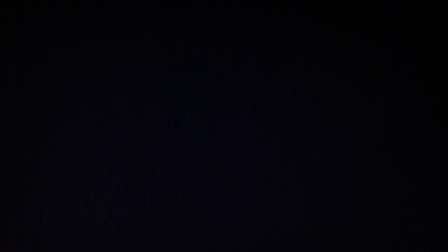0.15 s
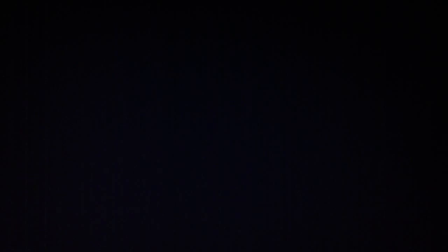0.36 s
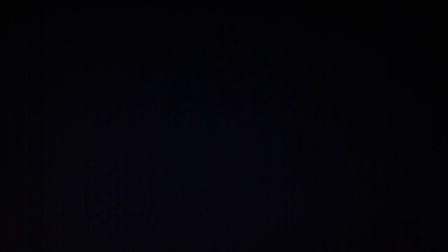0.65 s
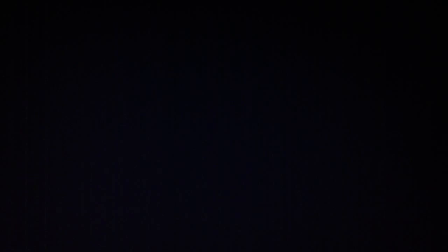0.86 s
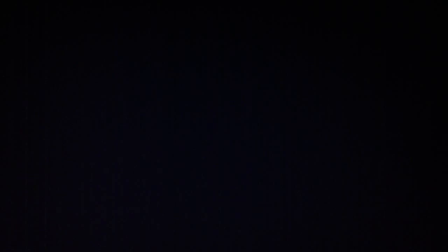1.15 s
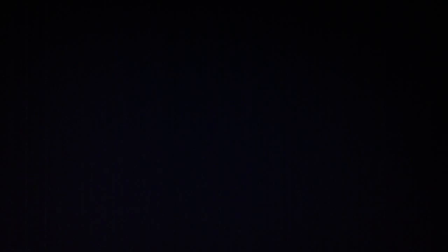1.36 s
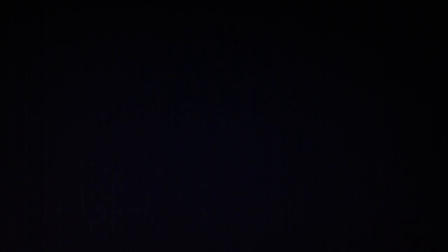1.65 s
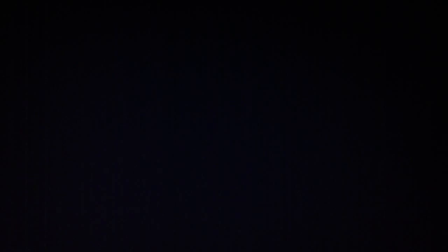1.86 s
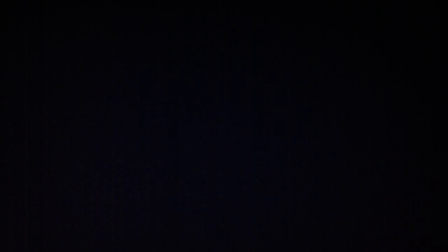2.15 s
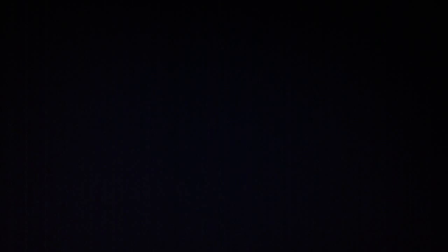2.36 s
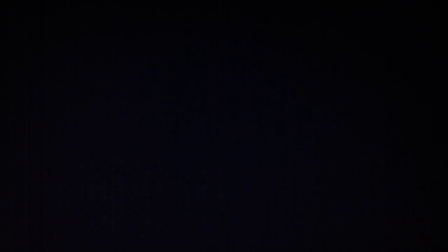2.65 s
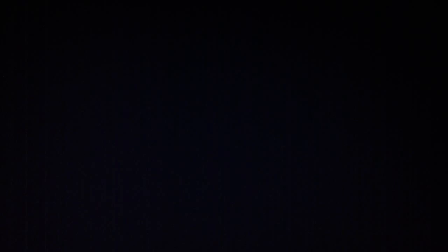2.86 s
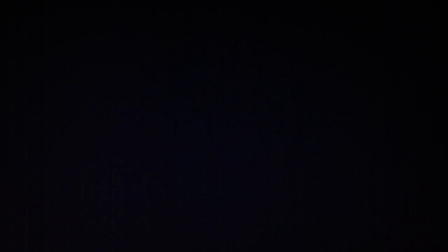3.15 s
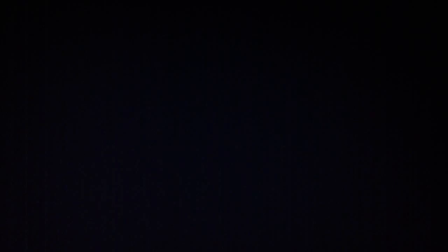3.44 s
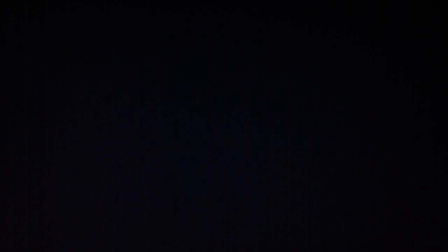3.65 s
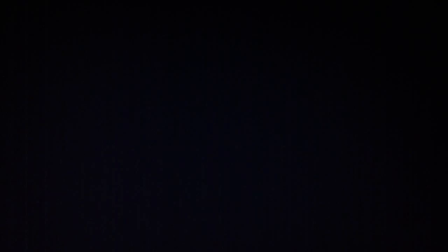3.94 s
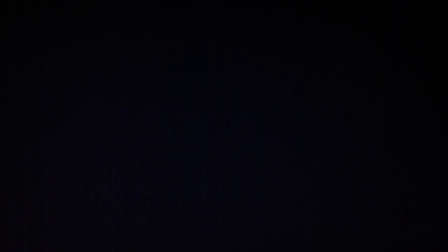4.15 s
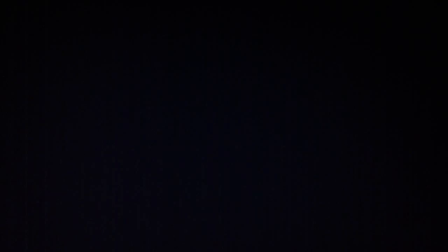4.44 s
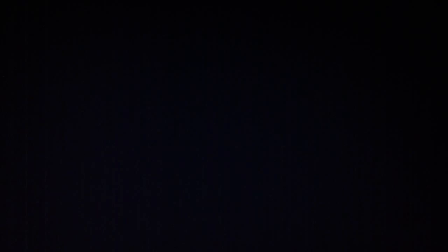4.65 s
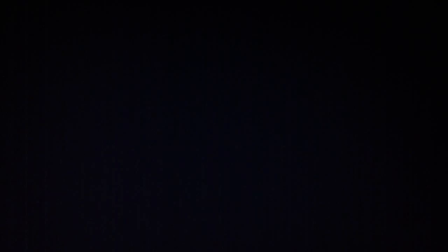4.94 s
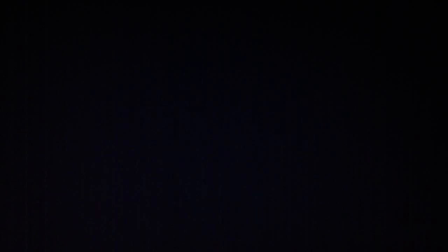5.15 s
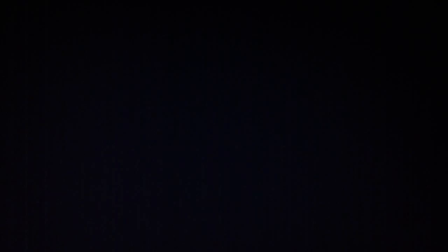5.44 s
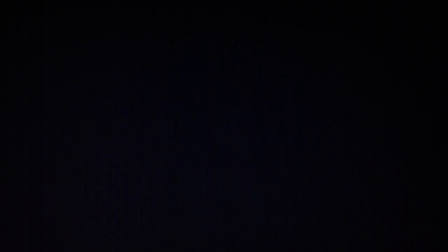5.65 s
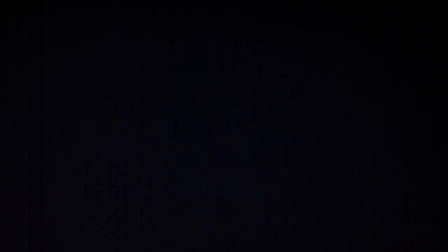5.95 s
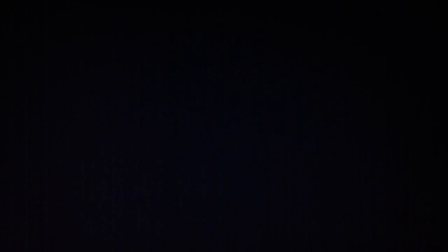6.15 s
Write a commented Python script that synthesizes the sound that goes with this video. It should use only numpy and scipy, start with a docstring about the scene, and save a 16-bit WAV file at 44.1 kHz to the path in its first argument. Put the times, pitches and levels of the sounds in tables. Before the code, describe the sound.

A close microphone fixed to a speeding sled picks up the boxy low boom of its hull over rough ice. One sharp steel crack comes near the start, then uneven bumps pound the shell. A brief sideways scrape hisses before two seconds. Afterwards the ride grows louder and rougher, with many slaps, rattles, gritty bursts and faint squeaks, still going strong at the end. The sound is dry and mono.

```python
"""A deep, hollow rumble comes first, with rattling and a fine crackle: a bobsleigh on ice, heard from on board.
Noise shaped like the hull's tone makes the rumble; each bump thumps the hull, knocks the frame and shakes fittings.
A hard clack comes near the start, then ice chips tick and a hissing skid swells and fades.
Bursts of filtered noise make the slaps, grit, squeaks and ice dust; the rumble climbs slightly in pitch.
A limiter holds the loudest peaks."""
import sys
import numpy as np
from scipy import signal
from scipy.fft import rfft, irfft
from scipy.io import wavfile
from scipy.ndimage import uniform_filter1d, minimum_filter1d

SR = 44100
rng = np.random.default_rng(int(sys.argv[2]) if len(sys.argv) > 2 else 0)


def materialize(psi):
    """Save the field psi as 16-bit PCM at rate SR to the path in sys.argv[1].

    A 1-D psi becomes a single channel; in a 2-D psi each row is a channel.
    """
    bounded = np.clip(np.atleast_2d(psi).T, -1, 1)
    quanta = np.round(bounded * 32767).astype(np.int16)
    wavfile.write(sys.argv[1], SR, quanta)


N = 277830
T = np.arange(N) / SR  # time of each sample, s

# All table levels are relative: the layer that plays a table may add its own gain.


def amp(db):
    """Turns decibels into a gain."""
    return 10 ** (np.asarray(db) / 20)


def unit(x):
    """Scales a signal to rms 1."""
    return x / np.sqrt(np.mean(x ** 2) + 1e-20)


def colour(x, spectrum, peaks=(), ripple_db=0):
    """Filters a sound with a spectrum, resonant peaks and a random ripple of lesser modes; the result has rms 1."""
    hz = abs(np.fft.fftfreq(8192, 1 / SR))
    table_hz, table_db = np.transpose(spectrum)
    db = np.interp(np.log(hz + 1), np.log(table_hz), table_db)
    for centre, width, height in peaks:
        db = db + height / (1 + (2 * (hz - centre) / width) ** 2)
    modes_hz = np.linspace(0, np.sqrt(SR / 2), 130) ** 2
    db = db + ripple_db * np.interp(hz, modes_hz, rng.uniform(-1.46, 1, len(modes_hz)))
    # minimum phase: the filter answers only after it is struck
    response = np.fft.ifft(np.exp(np.conj(signal.hilbert(np.log(amp(db)))))).real
    return unit(signal.oaconvolve(x, response[:len(hz) // 2])[:N])


def wander(rate_hz):
    """Smooth random motion of rms 1; changes faster than about the given rate are faded out."""
    hz = np.fft.rfftfreq(N, 1 / SR)
    smooth = rfft(rng.standard_normal(N)) * np.exp(-(hz / rate_hz) ** 2)
    return unit(irfft(smooth, N))


def grains(per_s, spread_db):
    """Tiny contacts of random size at random moments, together of rms 1."""
    size = amp(spread_db * np.minimum(rng.exponential(1, N), 4))
    happens = rng.random(N) < per_s / SR
    return unit(size * rng.choice([-1, 1], N) * happens)


def steady(x, seconds):
    """Evens out the strength of a vibration, so that the force applied to it sets its level."""
    window = signal.windows.hann(int(seconds * SR) + 2)
    power = signal.oaconvolve(x ** 2, window / window.sum(), "same")
    return x / np.sqrt(power + 1e-4)


def shifting(x, spectrum, peaks, ripple_db, count):
    """The contact hops from spot to spot; each spot rings with its own modes. Keeps the overall rms."""
    hops = np.cumsum(rng.random(N) < 55 / SR)  # about 55 hops per second
    spot = rng.integers(0, count, N)[hops]
    total = np.zeros(N)
    for k in range(count):
        part = x * (spot == k)
        total += colour(part, spectrum, peaks, ripple_db) * np.std(part)
    return np.std(x) * unit(total)


def strikes(rows, fall_s):
    """Strength of a row of blows: each starts at once and dies away exponentially."""
    hits = np.zeros(N)
    for s, db in rows:
        hits[round(s * SR)] += amp(db)
    return signal.lfilter([1], [1, -np.exp(-1 / (fall_s * SR))], hits)


def cushioned(force):
    """Rounds the edges of a force over about a millisecond, the time that a contact takes."""
    return uniform_filter1d(uniform_filter1d(force, size=30), size=20)


# the ride between bumps: t/s, load on the runners level/dB, rattle level/dB
RIDE = [(0.0, -27, -47), (0.37, -36.5, -59), (0.59, -33, -56), (0.82, -32.5, -54), (1.28, -26, -57.5),
        (1.65, -29, -46), (2.14, -33, -52), (2.53, -30.5, -48), (2.9, -34.5, -48.5), (3.14, -30.5, -45),
        (3.26, -30, -46), (3.47, -33.5, -43.5), (3.91, -27.5, -42), (4.4, -28.5, -44.5),
        (4.561, -30, -45.5), (5.0, -27, -47), (5.28, -27.5, -42.5), (6.3, -28.5, -45)]


def riding(column, db, follow, rise_db_per_s):
    """Gain of a layer between bumps: it follows a column of the ride by its own share, plus a steady drift."""
    ride = np.array(RIDE)
    ride_db = np.interp(T, ride[:, 0], ride[:, column])
    return amp(db + follow * (ride_db - ride_db.mean()) + rise_db_per_s * T)


# the runners go light, then press again: start t/s, end t/s, deepest level/dB (above 0 has no effect)
LIGHT_MOMENTS = [(0.108, 0.126, -12), (0.18, 0.214, -5), (0.482, 0.51, -4), (0.982, 0.989, -4),
                 (0.998, 1.015, -7), (1.052, 1.098, -5), (1.885, 1.945, -2), (2.05, 2.09, -7),
                 (2.205, 2.265, -3), (2.47, 2.498, -6), (2.958, 3.034, -21), (3.165, 3.209, -11),
                 (3.225, 3.268, -2), (3.325, 3.354, -4.5), (3.57, 3.622, -2), (3.82, 3.867, -17.5),
                 (3.895, 3.934, -6), (4.055, 4.097, -1.5), (4.21, 4.273, -9), (4.57, 4.62, -1),
                 (4.87, 4.91, 0.5), (4.965, 5.012, -5.5), (5.04, 5.096, -7.5), (5.2, 5.221, -11),
                 (5.36, 5.4, -4), (5.565, 5.62, -8.5), (5.82, 5.849, 1)]
# just before every bump or slap the sled hops and the load eases: length in s, deepest dB
HOP_S, HOP_DB = 0.015, -1.5


def contact():
    """Share of the rolling load that reaches the sled: it ebbs through each light moment or hop and returns at once."""
    hops = [(row[0] - HOP_S, row[0], HOP_DB) for row in list(BIG_BUMPS) + list(FITTING_SLAPS)]
    db = np.zeros(N)
    for start, end, depth in list(LIGHT_MOMENTS) + hops:
        near = slice(*np.searchsorted(T, [start, end]))
        ebb = depth * ((T[near] - start) / (end - start)) ** .5
        db[near] = np.minimum(db[near], ebb)
    return amp(uniform_filter1d(db, size=100))


# the big bumps in the ice: t/s, frame knock level/dB, hull thump level/dB, rattle level/dB
BIG_BUMPS = [(0.339, -19.5, -9, -54), (0.513, -28, -18.5, -57), (0.632, -16, -8, -46.5),
             (0.677, -13.5, -5.5, -47.5), (0.793, -16, -7, -52), (0.892, -16.5, -6, -62),
             (0.949, -23, -9, -46.5), (0.986, -20, -12, -43), (1.028, -26, -13.5, -47),
             (1.106, -12, -10.5, -55.5), (1.259, -24, -13, -55.5), (1.345, -11, -1.5, -45),
             (1.418, -26, -11.5, -49), (1.468, -17, -10.5, -45.5), (1.533, -18, -9.5, -45),
             (1.6, -20, -10.5, -41.5), (1.65, -31, -9, -45.5), (1.708, -18, -12, -50),
             (1.761, -12, -1.5, -28.5), (1.837, -14, -6, -33), (1.959, -18, -11, -40.5),
             (2.018, -9.5, -4, -39), (2.094, -21, -5.5, -45), (2.145, -15, -7, -39.5),
             (2.191, -34, -13, -45), (2.298, -17.5, -11.5, -46.5), (2.344, -13, -5.5, -39.5),
             (2.386, -16, -14.5, -38.5), (2.418, -16, -6, -37.5), (2.521, -14.5, -5, -32.5),
             (2.586, -11, -3.5, -37.5), (2.85, -5.5, -4.5, -35.5), (2.901, -31, -16, -49.5),
             (3.038, -13.5, -5, -31), (3.146, -16.5, -8.5, -39.5), (3.184, -28, -10, -54),
             (3.273, -14, -7, -33), (3.355, -5, -4.5, -35), (3.409, -23, -8.5, -43),
             (3.446, -8, -5.5, -37.5), (3.527, -11.5, -7, -34), (3.625, -12, -8, -42),
             (3.655, -27, -9.5, -38), (3.687, -15, -5.5, -47), (3.785, -19, -6, -44),
             (3.827, -14, -10.5, -46.5), (3.87, -10, -6, -32.5), (3.941, -11.5, -6.5, -32),
             (4.012, -5, -2, -30), (4.132, -11.5, -4.5, -39.5), (4.192, -2, -8.5, -34),
             (4.277, -14.5, -7.5, -59.5), (4.337, -15, -11.5, -40.5), (4.425, -15, -6, -47),
             (4.529, -7.5, -5, -31.5), (4.587, -29, -8.5, -54.5), (4.636, -6.5, -2, -32.5),
             (4.73, -10.5, -9, -43.5), (4.799, -9, -6.5, -34), (4.857, -32, -14, -44.5),
             (4.927, -3.5, -2, -31), (5.014, -17, -10, -38), (5.096, -18.5, -11, -37.5),
             (5.145, -13, -2.5, -35), (5.227, -10.5, -7, -32), (5.301, -10, -13.5, -40),
             (5.402, -16, -5.5, -38.5), (5.454, -9.5, -2, -38.5), (5.506, -16, -8.5, -52.5),
             (5.534, -15, -4.5, -41.5), (5.597, -26, -3.5, -42), (5.661, -17, -7.5, -39.5),
             (5.728, -10, -9.5, -30), (5.824, -21, -10, -39), (5.908, -33, -6.5, -41.5),
             (5.973, -4.5, -5.5, -25), (6.051, -22, -12, -39), (6.149, -12, -13.5, -50),
             (6.2, -15, -9, -29.5), (6.261, -14, -10, -38)]


def jolts(column, rise_s, fall_s, lag_s):
    """Load from the bumps: it swells as a runner climbs each one and dies away after."""
    power = np.zeros(N)
    for row in BIG_BUMPS:
        near = slice(*np.searchsorted(T, [row[0] - .1, row[0] + .2]))
        t = T[near] - row[0] - lag_s
        shape = np.where(t < 0, np.exp(-(t / rise_s) ** 2), np.exp(-abs(t) / fall_s))
        power[near] += (amp(row[column]) * shape) ** 2
    return np.sqrt(power)


# the rumble climbs with speed: t/s, factor on its pitch
SPEED_CURVE = [(0, 0.93), (1.4, 0.94), (3.3, 0.98), (6.3, 0.99)]
# tone of the hollow hull: f/Hz, level/dB
HULL_TONE = [(20, -47.5), (55, -50), (72, -37), (95, -10.5), (122, 0), (160, 3), (210, 0.5), (243, -6),
             (285, -5.5), (350, -13), (480, -23), (700, -34.5), (1500, -77.5)]


def boom(even_s):
    """Hull vibration from rough ice, which passes faster and booms higher as the sled speeds up."""
    travel = np.cumsum(np.interp(T, *np.transpose(SPEED_CURVE)))
    rough_ice = colour(rng.standard_normal(N), HULL_TONE)
    return steady(np.interp(travel % N, np.arange(N), rough_ice), even_s)


# the hull's main swing after a bump: pitch in Hz, rms drift in octaves, strength against the boom in dB
SWING_HZ, SWING_DRIFT, SWING_DB = 154.9, 0.26, -4


def hull(small_bumps, bump_db=2.0):
    """The hollow shell booms under the rolling load and swings a few cycles after each bump."""
    load = riding(1, db=-13, follow=0.76, rise_db_per_s=-0.06) * small_bumps * contact() ** 0.48
    rumble = boom(even_s=0.048) * load
    swing_hz = SWING_HZ * 2 ** (SWING_DRIFT * wander(rate_hz=13.94))
    swing = unit(np.sin(2 * np.pi * np.cumsum(swing_hz) / SR))
    vibration = steady(boom(even_s=0.035) + amp(SWING_DB) * swing, seconds=0.047)
    thumps = vibration * jolts(2, rise_s=0.011, fall_s=0.02, lag_s=0.0092)
    return rumble + amp(bump_db) * thumps


# tone of the frame: f/Hz, level/dB
FRAME_TONE = [(100, -42), (280, 6), (400, 3), (520, 2.5), (660, -11.5), (850, -4), (1050, -16),
              (1450, -22.5), (2100, -25), (4000, -71.5)]


def frame(ruts, bump_db=-7.5, slap_db=3):
    """Rough ice, bumps and slapping parts drum on the frame."""
    rolling = riding(1, db=-34.5, follow=1.57, rise_db_per_s=0.63) * contact() * ruts
    bumps = amp(bump_db) * jolts(1, rise_s=0.013, fall_s=0.007, lag_s=0.0076)
    slaps = amp(slap_db) * strikes(FITTING_SLAPS, fall_s=0.0082)
    force = np.sqrt(rolling ** 2 + bumps ** 2 + slaps ** 2)
    drumming = shifting(grains(per_s=1500, spread_db=1.5), FRAME_TONE, (), ripple_db=4.0, count=10)
    return steady(drumming, seconds=0.022) * cushioned(force)


def judder(per_s, fall_s, spread_db, rest):
    """Small ruts load the runners at once and let go gradually, over a resting load."""
    ruts = amp(spread_db * rng.standard_normal(N)) * (rng.random(N) < per_s / SR)
    power = signal.lfilter([1], [1, -np.exp(-2 / (fall_s * SR))], ruts ** 2)
    power = power / (uniform_filter1d(power, size=6000) + .2 * power.mean())
    return unit(np.sqrt(abs(power) + rest ** 2))


def shaking(ruts, bump_db=-2):
    """Force on the loose parts: ruts and bumps, broken into fast chatter."""
    rolling = riding(2, db=-53.0, follow=1.2, rise_db_per_s=0.0) * contact() * ruts
    bumps = amp(bump_db) * jolts(3, rise_s=0.0057, fall_s=0.017, lag_s=0.0031)
    return np.hypot(rolling, bumps) * judder(per_s=760, fall_s=0.012, spread_db=3.0, rest=0.38)


# tone of the rattling fittings: f/Hz, level/dB
FITTINGS_TONE = [(300, -28.5), (900, 2), (1250, 4), (1600, -4), (2150, -7.5), (2700, 0), (3300, -5),
                 (4500, -7), (5900, -11.5), (6700, -21), (9500, -16.5), (16000, -49)]
# narrow resonances of the runners: f/Hz, width/Hz, level/dB
RUNNER_RINGS = [(1920, 480, 2), (3930, 170, 2.5), (4400, 160, 2), (5840, 61, 10)]


def fittings(force):
    """Loose parts chatter against the shell and set the runners ringing."""
    chatter = grains(per_s=9000, spread_db=0.5) * force
    return shifting(chatter, FITTINGS_TONE, RUNNER_RINGS, ripple_db=7.0, count=14)


def crackles(per_s=230, spread_db=3.0):
    """Small ridges of ice snap at random moments, harder as the sled speeds up: rows of t/s, level/dB."""
    gain = riding(2, db=-44.5, follow=0.87, rise_db_per_s=0.47) * contact()
    snaps = np.flatnonzero(rng.random(N) < per_s / SR)
    sizes_db = spread_db * np.clip(rng.standard_normal(N), -2, 2)
    return [(T[i], 20 * np.log10(gain[i]) + sizes_db[i]) for i in snaps]


# tone of ice snapping under the runners: f/Hz, level/dB
CRACKLE_TONE = [(400, -9.5), (900, 11), (1450, -9.5), (2100, 0.5), (3300, -9.5), (4500, -11), (6000, -13.5),
                (7000, -16.5), (10000, -16.5), (16000, -33)]


def scrape(fall_s=0.0019):
    """The snapping ice makes a dense, sharp crackle whose colour keeps shifting."""
    snaps = rng.standard_normal(N) * strikes(crackles(), fall_s)
    return shifting(snaps, CRACKLE_TONE, RUNNER_RINGS, ripple_db=5.0, count=12)


# tone of the ice dust: f/Hz, level/dB
DUST_TONE = [(500, -35), (2000, -16), (5000, -5), (6500, 4.5), (7800, 3.5), (9400, -2), (11500, -0.5),
             (14000, -4.5), (16000, -17.5)]
EARLY_DUST_DB = -17.5  # dust is fainter before the skid


def spray(force, follow=0.67):
    """Ice dust spurts from the runners whenever the shaking force rises above its local average."""
    surges = (force / np.sqrt(uniform_filter1d(force ** 2, size=13000))) ** follow
    early = amp(np.interp(T, [SKID_START_S, SKID_END_S], [EARLY_DUST_DB, 0]))
    thrown = riding(2, db=-60.5, follow=0.5, rise_db_per_s=0.65) * early
    dust = grains(per_s=8600, spread_db=5.0) * thrown * surges * np.sqrt(contact())
    return shifting(dust, DUST_TONE, (), ripple_db=13.0, count=16)


# slaps of loose fittings on the shell: t/s, peak level/dB
FITTING_SLAPS = [(0.058, -27.5), (0.083, -30.5), (0.1, -30), (0.166, -33), (0.216, -32), (0.231, -32),
                 (0.284, -33), (0.371, -33), (0.383, -38), (0.423, -43.5), (0.472, -39.5), (0.52, -40),
                 (0.566, -36), (0.636, -31), (0.671, -31.5), (0.686, -27), (0.705, -34.5), (0.748, -35.5),
                 (0.795, -26.5), (0.813, -35.5), (0.863, -32), (0.896, -37.5), (0.941, -28), (0.976, -23),
                 (0.99, -19.5), (1.016, -28), (1.044, -28.5), (1.156, -35.5), (1.194, -31.5),
                 (1.234, -30.5), (1.275, -35.5), (1.318, -35.5), (1.415, -24.5), (1.49, -30.5),
                 (1.761, -42), (1.789, -24), (1.81, -20.5), (1.836, -26), (1.874, -26.5), (1.969, -30),
                 (2.1, -22.5), (2.128, -30), (2.176, -29.5), (2.188, -27.5), (2.303, -30.5), (2.344, -30.5),
                 (2.399, -34), (2.431, -29), (2.46, -31), (2.5, -30), (2.522, -29.5), (2.54, -20),
                 (2.643, -30.5), (2.724, -31.5), (2.756, -35), (2.803, -29.5), (2.958, -32), (3.039, -25),
                 (3.122, -24.5), (3.212, -26), (3.274, -25), (3.332, -37.5), (3.358, -29), (3.43, -23.5),
                 (3.444, -20.5), (3.488, -32.5), (3.527, -23.5), (3.563, -33.5), (3.648, -21),
                 (3.663, -32.5), (3.703, -25), (3.721, -27), (3.747, -22), (3.761, -26), (3.79, -32),
                 (3.847, -32.5), (3.937, -27.5), (3.955, -27), (3.991, -22.5), (4.096, -23.5), (4.128, -26),
                 (4.148, -22), (4.328, -32), (4.375, -28), (4.451, -21), (4.48, -27), (4.51, -23),
                 (4.561, -21), (4.591, -22.5), (4.651, -21), (4.683, -22), (4.698, -21), (4.724, -27.5),
                 (4.739, -28.5), (4.912, -26), (4.952, -29.5), (4.974, -28), (5.017, -22.5), (5.066, -39.5),
                 (5.097, -32.5), (5.175, -23), (5.191, -28), (5.224, -19), (5.337, -27.5), (5.403, -32.5),
                 (5.428, -26), (5.464, -23.5), (5.484, -30), (5.504, -25), (5.549, -24), (5.625, -27.5),
                 (5.691, -21), (5.717, -20), (5.853, -24), (5.862, -22.5), (5.925, -33), (5.943, -23),
                 (6.016, -29), (6.047, -16.5), (6.099, -26.5), (6.123, -22), (6.15, -23), (6.177, -25.5),
                 (6.201, -20.5)]
# tone of a slapping fitting: f/Hz, level/dB
CLATTER_TONE = [(400, 6), (900, 6.5), (1450, -19), (2100, 3), (2700, -8), (3200, -8), (3700, -12),
                (4400, -9.5), (5100, -13.5), (5900, -21.5), (6800, -27.5), (9500, -21.5), (16000, -46)]


def clatter(slap_db=-5):
    """Each slap of a loose fitting is a short, ringing tick."""
    taps = rng.standard_normal(N) * strikes(FITTING_SLAPS, fall_s=0.0061)
    return amp(slap_db) * shifting(taps, CLATTER_TONE, RUNNER_RINGS, ripple_db=6.5, count=10)


# hard blows of metal on the frame: t/s, level/dB
HARD_BLOWS = [(0.127, -25), (0.1298, -6), (0.1432, -26), (2.849, -20), (5.977, -12)]
# tone of the crack: f/Hz, level/dB
CRACK_TONE = [(150, 5), (400, 12.5), (750, 7), (1300, 10.5), (2500, -3), (3300, -9.5), (4200, -0.5),
              (6000, -7.5), (9000, -11.5), (12000, -14.5), (16000, -17)]
# resonances of the struck steel: f/Hz, width/Hz, level/dB
STEEL_RINGS = [(457, 380, 10), (626, 190, 14.5), (900, 70, 12), (1240, 130, -1), (1380, 100, 11),
               (1800, 100, 12), (2320, 120, 13), (2877, 200, 22), (8800, 600, 14)]
# the body rings under a hard blow: f/Hz, level/dB, decay/s
BODY_RINGS = [(136.4, 1.5, 0.019), (291, -10.5, 0.014), (518, -18, 0.0067), (660, -5, 0.0045)]
AFTER_RING = 0.025  # the steel keeps a short after-ring, as a share of the blow


def clacks(crack_db=0.5, body_db=-20):
    """Metal meets metal: a dense crack in the steel that dies quickly, over a woody knock and a thud."""
    # two decays subtracted: the blow rises fast, then falls
    blow = 1.5 * (strikes(HARD_BLOWS, fall_s=0.0036) - strikes(HARD_BLOWS, fall_s=0.0009))
    force = np.hypot(blow, AFTER_RING * strikes(HARD_BLOWS, fall_s=0.023))
    steel = steady(colour(rng.standard_normal(N), CRACK_TONE, STEEL_RINGS), seconds=0.0047)
    crack = steel * cushioned(force)
    thud = steady(colour(rng.standard_normal(N), FRAME_TONE), seconds=0.0052)
    thud = thud * cushioned(strikes(HARD_BLOWS, fall_s=0.048))
    t = T[:SR // 4]
    ring = sum(amp(db) * np.exp(-t / fall_s) * np.sin(2 * np.pi * hz * t) for hz, db, fall_s in BODY_RINGS)
    hits = np.zeros(N)
    for s, db in HARD_BLOWS:
        hits[round(s * SR)] = amp(db)
    knock = signal.oaconvolve(hits, ring)[:N]
    return amp(crack_db) * crack + amp(body_db) * thud + knock


# spurts of gritty ice from a runner edge: t/s, level/dB
GRIT_SPURTS = [(0.291, -52), (1.016, -43.5), (1.876, -44), (2.032, -46), (2.104, -44), (2.157, -41),
               (2.4, -39), (2.427, -41), (2.602, -46), (2.643, -43.5), (2.724, -43), (2.785, -43),
               (3.171, -45), (3.429, -38), (3.602, -40), (3.631, -39), (3.746, -38), (3.791, -39),
               (3.846, -47), (3.879, -49), (3.953, -41), (4.013, -32), (4.371, -50), (4.535, -34),
               (5.098, -48), (5.176, -40), (5.339, -36.5), (5.437, -54), (5.625, -47), (6.124, -37.5)]
# tone of the grit: f/Hz, level/dB
GRIT_TONE = [(1000, -13.5), (3000, 2), (5500, 1.5), (7000, -1), (9500, 0), (12000, -6.5), (14000, -12),
             (16000, -20)]


def spurts(fall_s=0.0047):
    """A runner edge chips the ice and throws a short, bright burst of grit."""
    burst = grains(per_s=4100, spread_db=3.5) * cushioned(strikes(GRIT_SPURTS, fall_s))
    return shifting(burst, GRIT_TONE, (), ripple_db=14.0, count=8)


# ice chips ticking on the shell: t/s, peak level/dB
ICE_CHIPS = [(0.491, -36), (0.536, -33), (0.575, -32), (0.605, -30), (0.759, -36), (0.844, -25),
             (0.997, -36), (1.031, -31), (1.118, -32), (1.426, -36), (1.44, -26), (1.478, -28),
             (1.493, -28), (1.523, -27), (1.54, -32), (1.567, -34), (1.587, -33), (1.954, -34)]


def chips(tick_db=-9):
    """Thin, bright ticks of flying ice: very short noise bursts with the lows removed."""
    ticks = cushioned(strikes(ICE_CHIPS, fall_s=0.0012)) * rng.standard_normal(N)
    treble = signal.butter(2, 5000, "high", fs=SR, output="sos")
    return amp(tick_db) * signal.sosfilt(treble, ticks)


# the runners slide sideways once: times in s, starting level and swell of the hiss
SKID_START_S, SKID_END_S, SKID_ATTACK_S, SKID_RELEASE_S = 1.45, 1.7, 0.0102, 0.15
SKID_DB, SKID_SWELL_DB_PER_S = -55, 31
# tone of the shaved ice: f/Hz, level/dB
SHAVING_TONE = [(500, -8), (2000, -4), (5000, 1.5), (9000, 3), (13000, 0.5), (16000, -6)]


def skid(catch_db=8.5):
    """Sliding runners shave the ice: they catch in fits at first, then swell to an even hiss and let go."""
    catching_db = np.interp(T, [SKID_START_S, SKID_END_S], [catch_db, 0])
    shavings = grains(per_s=7000, spread_db=4.0) * amp(catching_db * wander(rate_hz=92))
    bite = np.clip((T - SKID_START_S) / SKID_ATTACK_S, 0, 1)
    swell = amp(SKID_DB + SKID_SWELL_DB_PER_S * (np.minimum(T, SKID_END_S) - SKID_START_S))
    release = np.exp(-(np.maximum(T - SKID_END_S, 0) / SKID_RELEASE_S) ** 2)
    hiss = shifting(shavings, SHAVING_TONE, (), ripple_db=4, count=6)
    return hiss * bite * swell * release


# a runner edge grinds or squeaks: middle t/s, length/s, f/Hz, level/dB
EDGE_RASPS = [(1.799, 0.013, 9550, -39.5), (3.218, 0.0085, 7050, -39), (4.47, 0.14, 1440, -44),
              (4.537, 0.05, 11300, -51), (4.603, 0.014, 9900, -47), (5.364, 0.25, 2070, -44)]


def rasps(width=0.14, flutter_db=5.0):
    """Here and there a runner edge grinds or squeaks on the ice: one narrow resonance swells and fades."""
    out = np.zeros(N)
    friction = rng.standard_normal(N) * amp(flutter_db * wander(rate_hz=72))
    for s, length, hz, db in EDGE_RASPS:
        edges = [hz / (1 + width), min(hz * (1 + width), .45 * SR)]
        band = signal.butter(2, edges, "band", fs=SR, output="sos")
        swell = np.exp(-(2 * (T - s) / length) ** 2)
        out += amp(db) * swell * unit(signal.sosfilt(band, friction))
    return out


# plumes of ice dust: middle t/s, length/s, level/dB
DUST_PLUMES = [(3.974, 0.11, -46.5), (4.17, 0.072, -44), (5.146, 0.097, -50), (5.31, 0.11, -49),
               (5.73, 0.14, -44), (6.014, 0.18, -43), (6.242, .12, -53)]
# tone of a plume: f/Hz, level/dB
PLUME_TONE = [(1000, 8), (3000, 5), (5500, 6.5), (7500, -2), (10000, 0), (13000, -6), (16000, -14)]


def plumes():
    """Now and then the runners throw up longer plumes of ice dust, a smooth, bright hiss."""
    level = sum(amp(db) * np.exp(-(2 * (T - s) / length) ** 2) for s, length, db in DUST_PLUMES)
    return level * colour(grains(per_s=21000, spread_db=-2.0), PLUME_TONE, ripple_db=-2)


def scene():
    """Shared small bumps and ruts shake hull, frame, fittings and spray; one microphone rides on the sled."""
    small_bumps = unit(amp(1.66 * np.tanh(wander(rate_hz=26))))
    ruts = small_bumps * judder(per_s=61, fall_s=0.0067, spread_db=4.0, rest=0.8)
    force = shaking(ruts)
    ride = hull(small_bumps) + frame(ruts) + fittings(force) + scrape() + spray(force)
    knocks = clatter() + clacks()
    ice = spurts() + chips() + skid() + rasps() + plumes()
    return (ride + knocks + ice)[None]


EDGE_HZ = 15700  # upper limit of the sound


def record(dry):
    """A fast limiter holds the peaks under full scale; then a filter removes the highest treble."""
    ceiling = .97
    headroom = np.minimum(1, ceiling / (abs(dry[0]) + 1e-9))
    gain = minimum_filter1d(headroom, size=220)
    gain = uniform_filter1d(uniform_filter1d(gain, size=120), size=60)
    lowpass = signal.firwin(511, EDGE_HZ, window=("kaiser", 9), fs=SR)[None]
    return signal.oaconvolve(dry * gain, lowpass, "same")


dry = scene()
out = record(dry)
materialize(out)
```